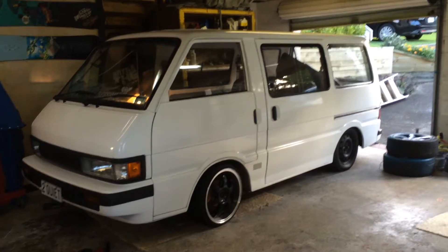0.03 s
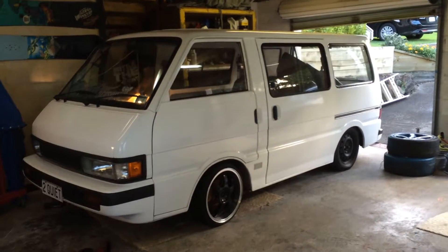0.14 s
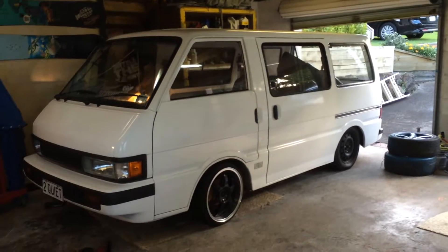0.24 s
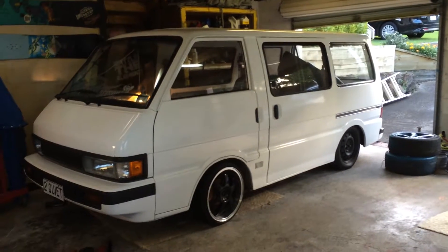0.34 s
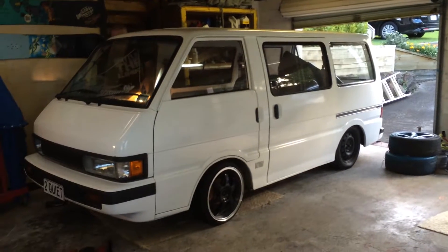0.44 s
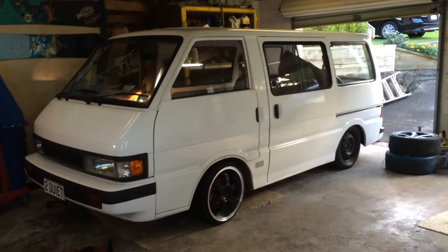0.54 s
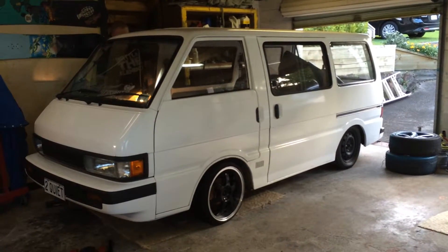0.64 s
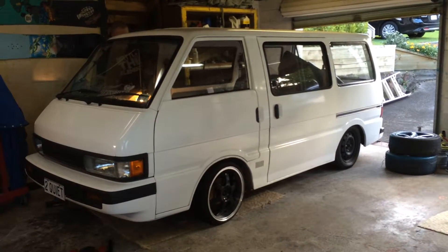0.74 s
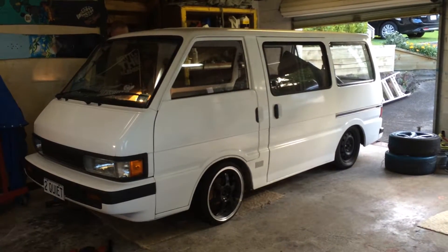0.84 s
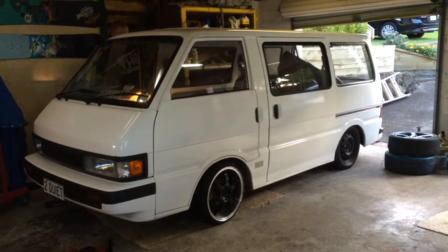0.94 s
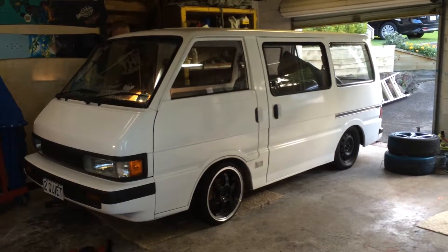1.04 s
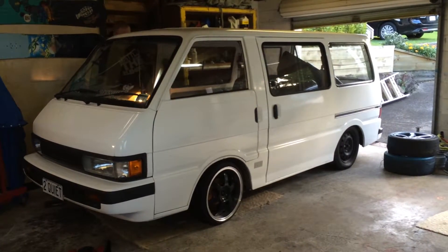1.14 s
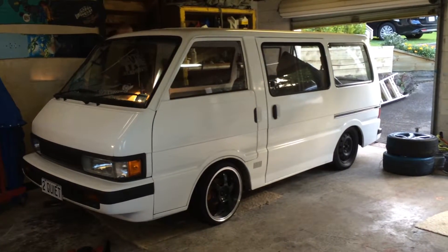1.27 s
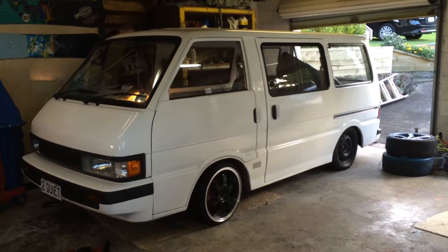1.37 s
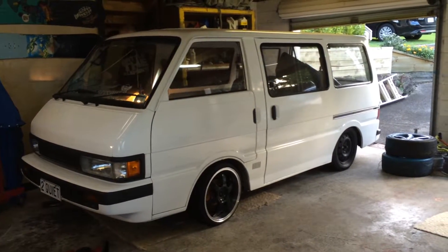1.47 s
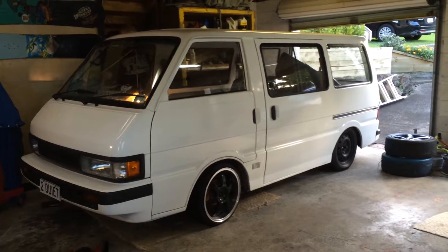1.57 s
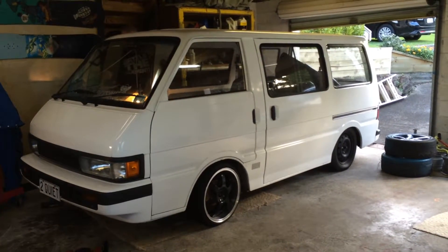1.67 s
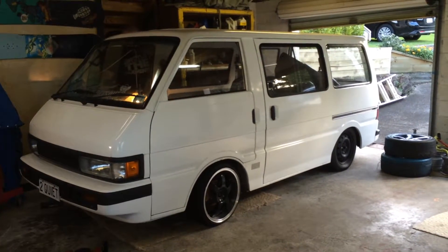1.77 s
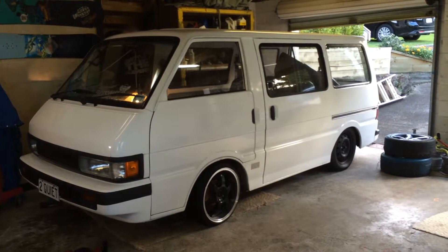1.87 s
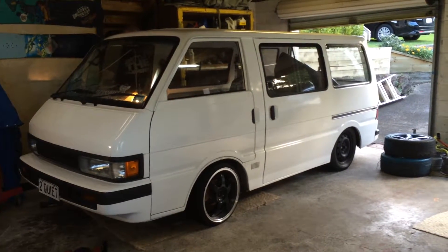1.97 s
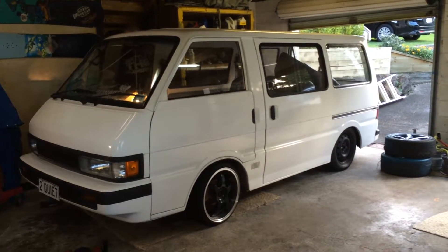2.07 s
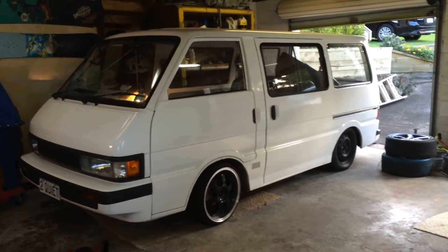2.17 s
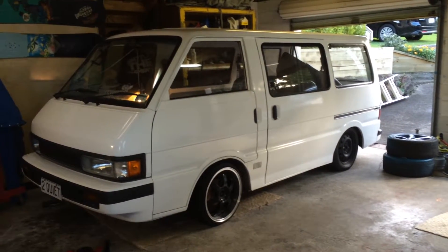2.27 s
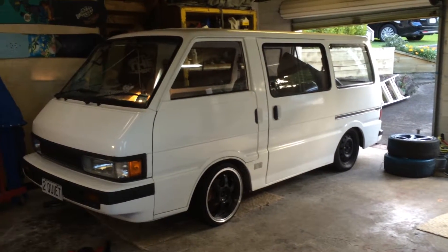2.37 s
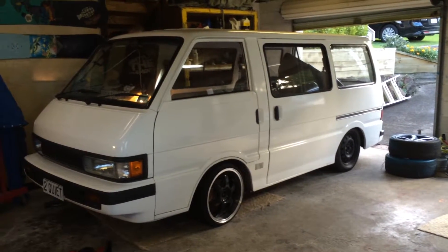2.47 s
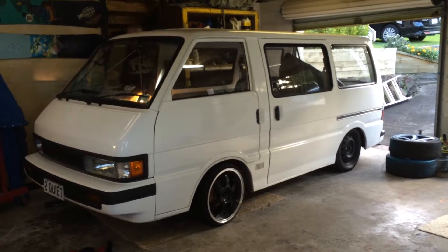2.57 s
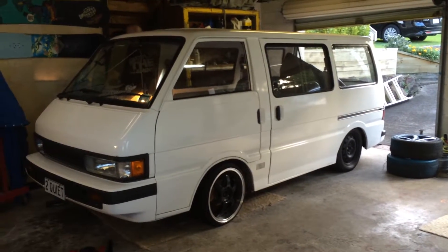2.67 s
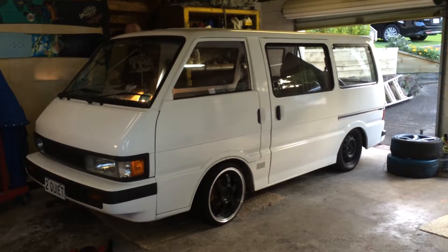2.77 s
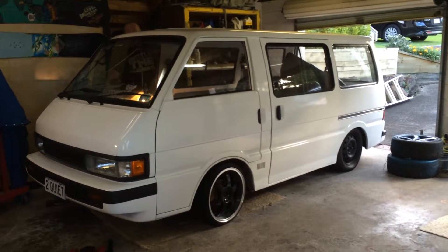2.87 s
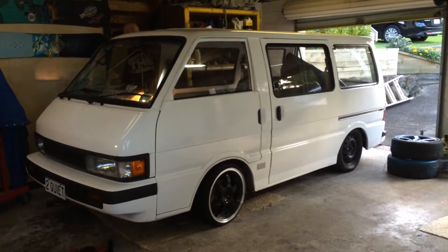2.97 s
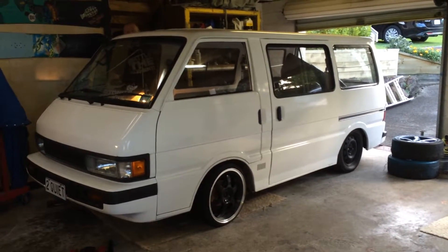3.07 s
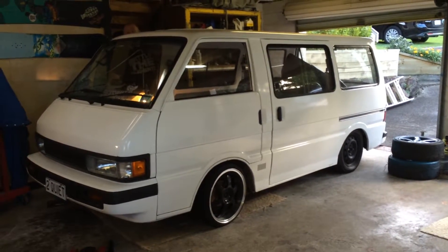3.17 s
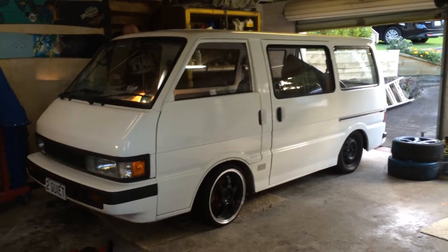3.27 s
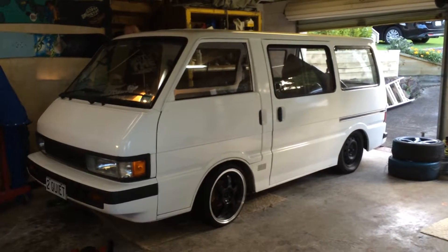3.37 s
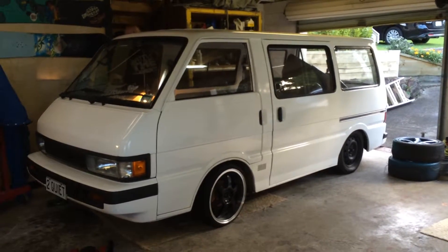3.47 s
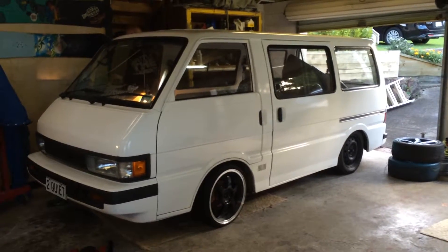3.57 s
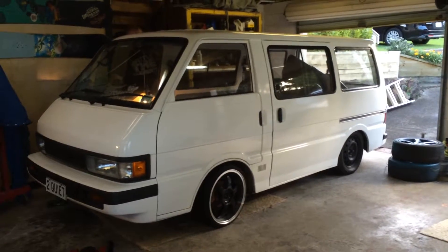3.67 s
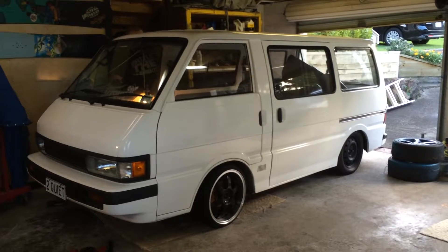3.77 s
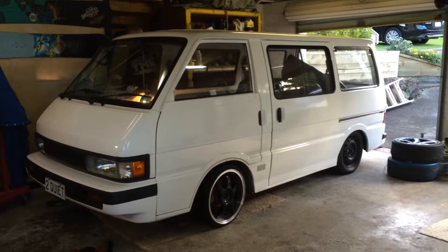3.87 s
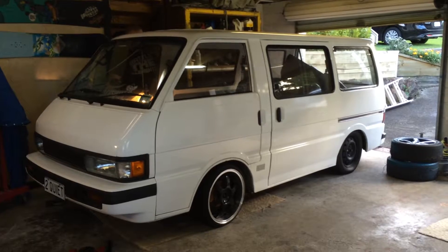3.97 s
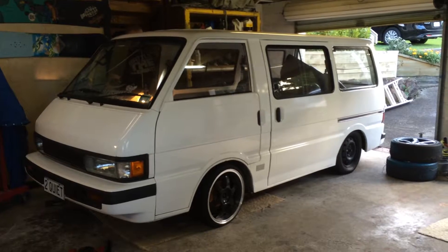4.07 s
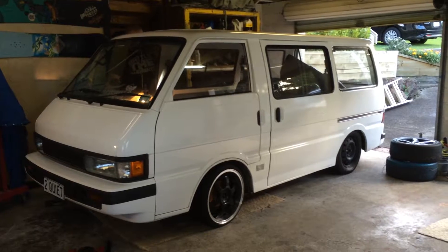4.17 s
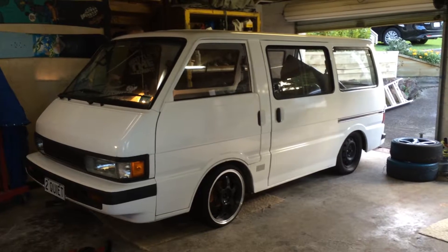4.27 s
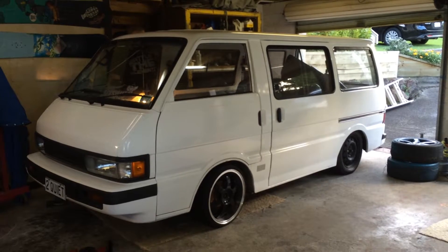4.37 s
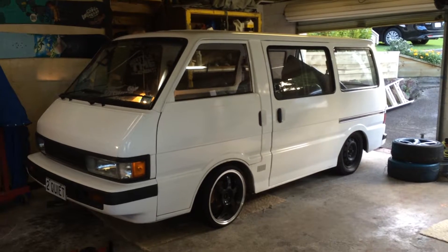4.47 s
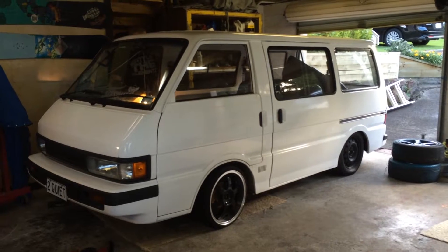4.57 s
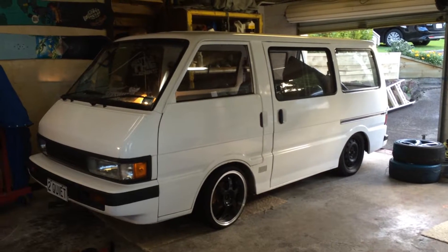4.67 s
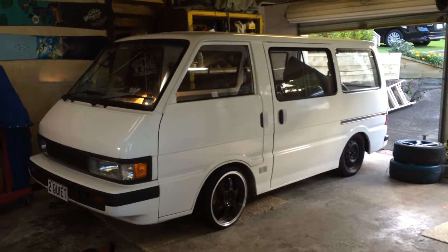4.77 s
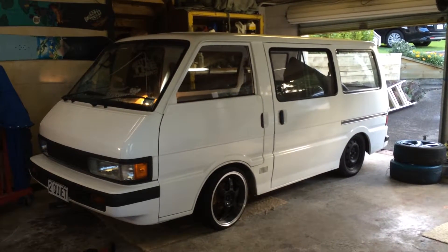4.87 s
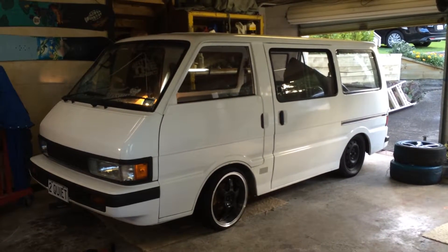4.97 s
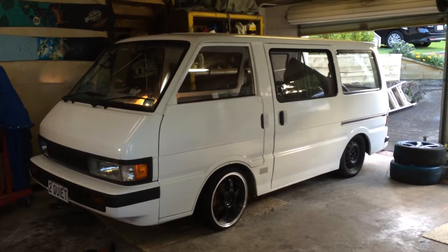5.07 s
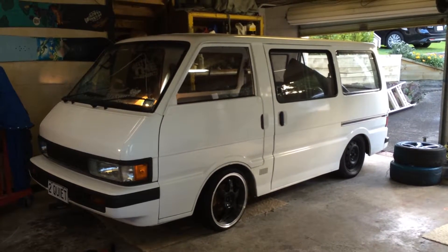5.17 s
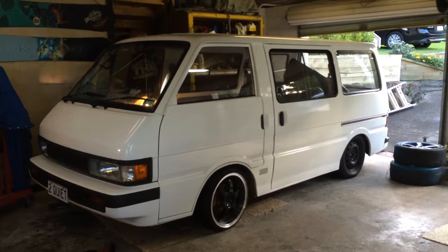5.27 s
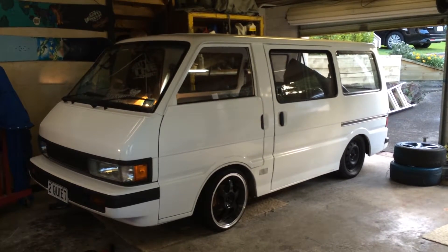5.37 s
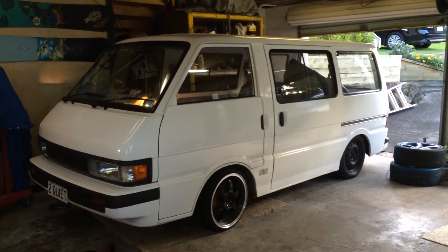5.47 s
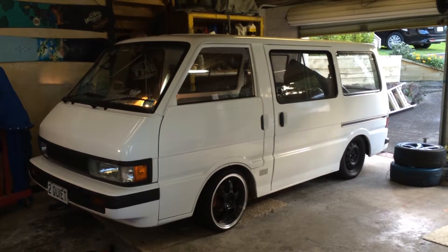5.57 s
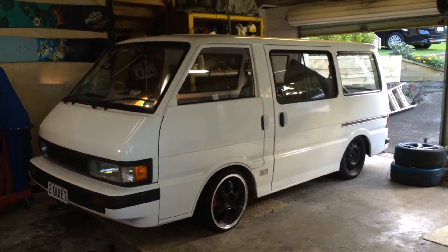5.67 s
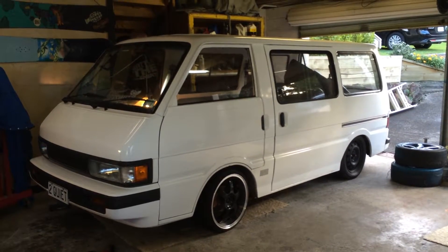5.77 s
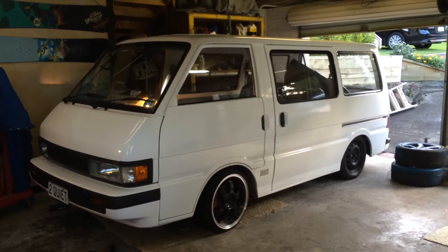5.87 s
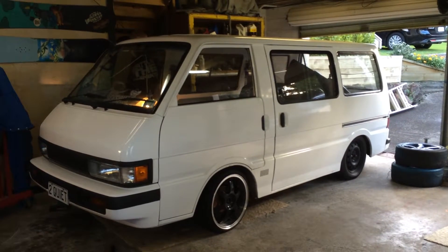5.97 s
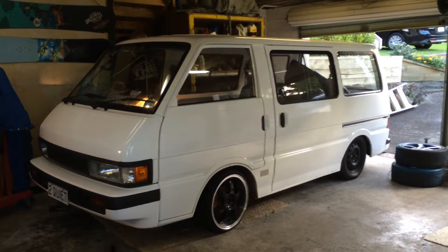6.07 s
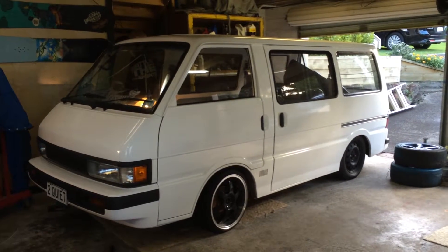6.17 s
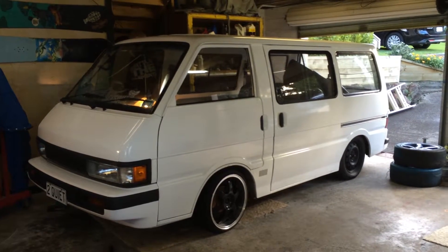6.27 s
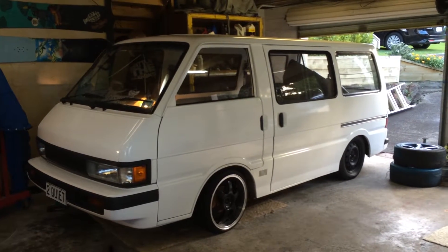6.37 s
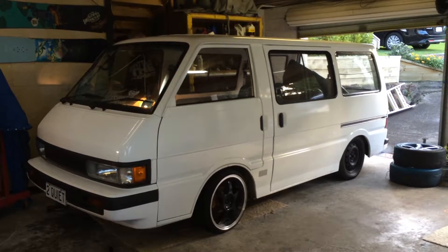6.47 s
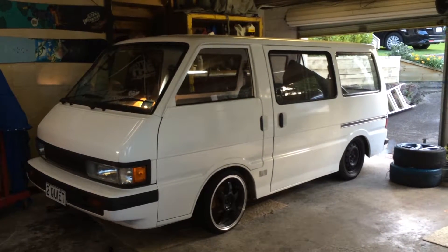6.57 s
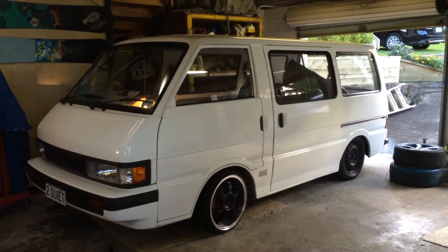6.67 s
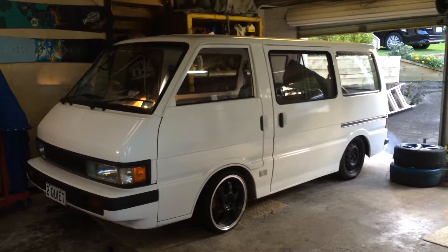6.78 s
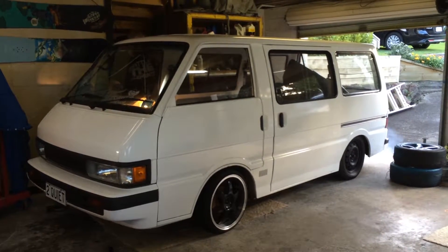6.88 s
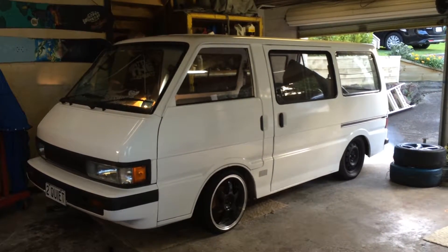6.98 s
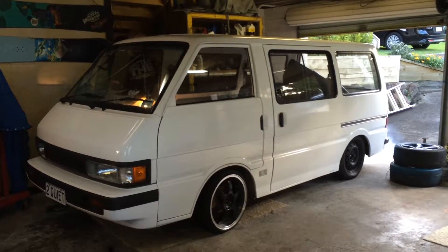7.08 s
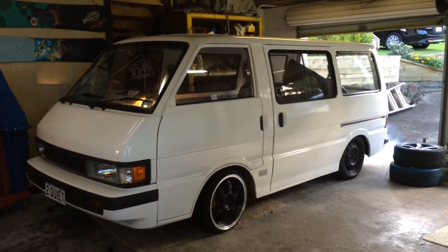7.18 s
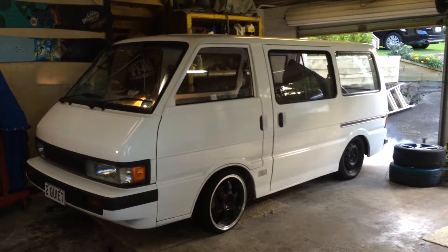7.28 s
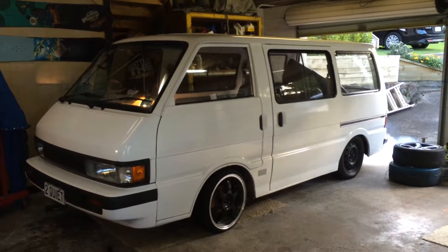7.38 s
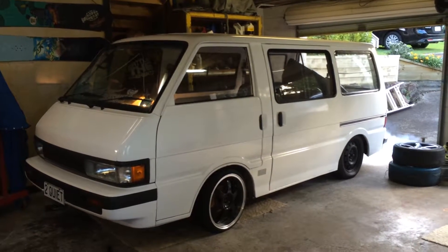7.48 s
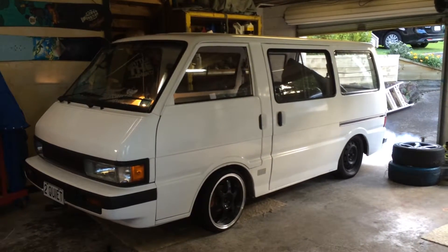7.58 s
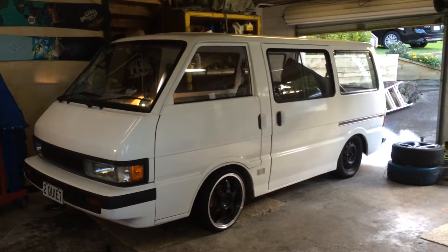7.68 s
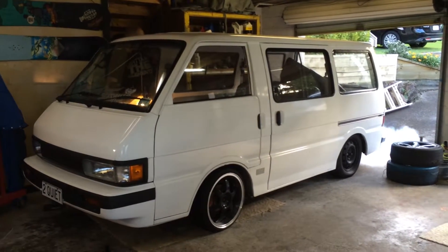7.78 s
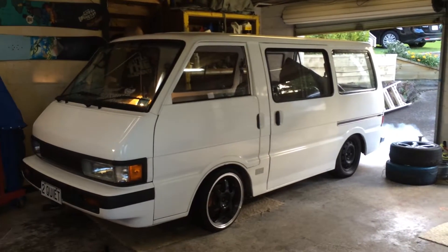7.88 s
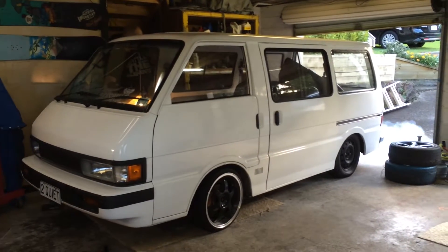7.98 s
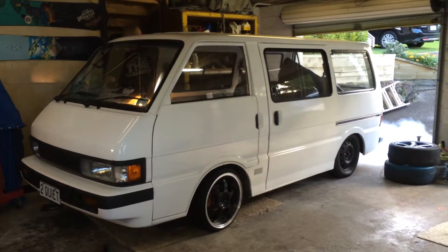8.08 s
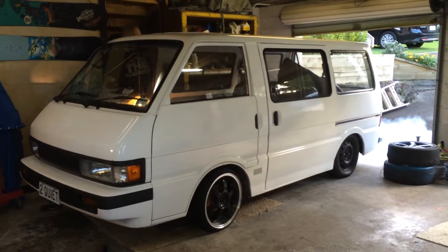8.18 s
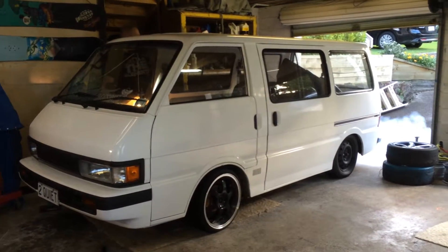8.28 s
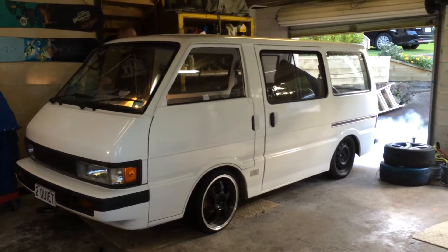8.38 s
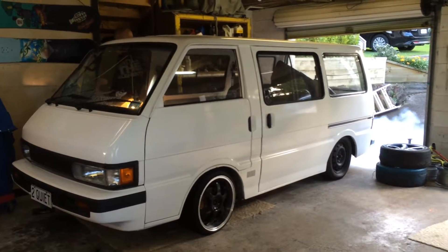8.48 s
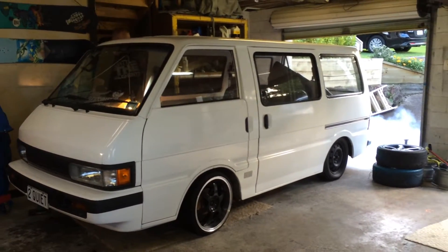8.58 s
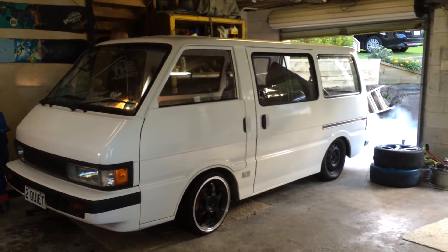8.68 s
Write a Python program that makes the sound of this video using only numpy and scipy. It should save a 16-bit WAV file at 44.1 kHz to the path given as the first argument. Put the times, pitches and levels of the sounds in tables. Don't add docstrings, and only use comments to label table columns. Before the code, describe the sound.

Very quiet opening: garden birds whistling, soft traffic rumble. A small electric pump begins to hum steadily and the birds thin out. Then the starter slams in, rasps for about half a second, and the engine bursts to life with hollow pops. A resonant, nasal exhaust drone takes over, rough and pulsing, with metallic rattle and breathy hiss, slowly dropping in speed. A single fixed microphone near the van in a garage, far louder after the start.

```python
import sys
import numpy as np
from scipy import signal
from scipy.fft import rfft, irfft, next_fast_len
from scipy.io import wavfile
from scipy.ndimage import uniform_filter1d

SR = 44100
rng = np.random.default_rng(int(sys.argv[2]) if len(sys.argv) > 2 else 0)


def boost(x):
    u = np.asarray(x, float) / 20
    return 10 ** u


def dump(signal):
    limited = np.clip(np.atleast_2d(signal).T, -1, 1)
    pcm = np.round(limited * 32767).astype(np.int16)
    wavfile.write(sys.argv[1], SR, pcm)


N = 384552
T = np.arange(N) / SR

# (time [s], peak level [dB])
POP_EVENTS = [(6.194, -15), (6.24, -10.5), (6.284, -11), (6.324, -3.5), (6.345, -10), (6.37, -5.5),
              (6.428, -3), (6.463, -4), (6.509, -6.5), (6.538, -13), (6.599, -4), (8.444, -9), (8.489, -13),
              (8.543, -12), (8.612, -15), (8.664, -14)]
SONG_LULLS = [
    6.61,
    7.37,
]
LULL_S, LULL_DB = 0.1, -6
DRONE_ORDER = 15


def engine():
    # (time [s], speed [turns/s])
    rotor_speed = [(6.6, 12.592), (6.7, 12.498), (6.8, 12.92), (7.1, 12.985), (7.3, 13.261), (7.6, 13.0),
                   (7.9, 12.635), (8.1, 12.226), (8.72, 11.655)]
    # (time [s], level [dB])
    effort = [(6.17, -8), (6.226, -9), (6.24, -2), (6.388, 2.5), (6.52, 4), (6.655, -4), (6.69, -1),
              (7.362, 1), (8.72, -0.2)]
    # (start [s], end [s], first pitch [Hz], last pitch [Hz], level [dB])
    pipe_ringing = [(6.188, 6.24, 157, 121, -20.5), (6.232, 6.285, 200, 180, -18.5),
                    (6.27, 6.35, 124, 94, -20.5), (6.34, 6.43, 208, 208, -15.5),
                    (6.43, 6.57, 220, 213, -16), (6.39, 6.52, 435, 436, -24.5),
                    (6.26, 6.37, 289, 307, -24.5), (6.4, 6.56, 298, 312, -22), (6.585, 6.62, 202, 203, -20),
                    (8.42, 8.49, 315, 325, -23), (8.47, 8.515, 235, 185, -17.5),
                    (8.51, 8.59, 225, 250, -18.5), (8.605, 8.645, 213, 214, -15.5),
                    (8.6, 8.69, 295, 345, -19.5), (8.665, 8.718, 101, 80, -24)]
    speed, effort_db = curve(rotor_speed)[0], curve(effort)[0]
    angle = np.cumsum(speed) / SR
    angle -= angle[round(rotor_speed[0][0] * SR)]

    tuned_db = -10 * np.log10(1 + (2 * (DRONE_ORDER * speed - 185) / 14) ** 2)
    drone_db = -13.1 + 0.17 * effort_db + tuned_db + LULL_DB * bumps(SONG_LULLS, LULL_S)
    firing_db = -21 + 0.7 * effort_db

    running = gate(6.17, 8.95, 0.026)
    exhaust = catching_pops() + ragged_firings(angle, firing_db) * running
    low_cut = signal.butter(2, 62, "high", fs=SR, output="sos")
    exhaust = signal.sosfilt(low_cut, exhaust)
    ringing = streaks(pipe_ringing, 0.095, 0.11, -21)
    note = exhaust_note(angle, drone_db, firing_db)
    return note + exhaust + ringing + clatter_and_hiss(angle, effort_db) * running


def exhaust_note(angle, drone_db, firing_db):
    # (level at high idle [dB], level once it sags [dB])
    order_levels = [(-48, -55), (-46, -44), (-44, -39), (-40, -42), (-42, -46), (-32, -31.5),
                    (-37.5, -29.5), (-39, -41), (-27, -28.5), (-33, -45), (-32, -32.5), (-36, -35),
                    (-33, -39), (-20, -15), (-41, -35), (-42, -34), (-22.5, -32), (-37, -40), (-44, -26.5),
                    (-44, -34), (-36, -41), (-30.5, -33), (-38, -33.5), (-29.5, -34), (-42, -40),
                    (-40, -35), (-34, -44), (-46, -46), (-31, -35), (-45, -40), (-49, -38.5), (-35.5, -38),
                    (-39, -52), (-46, -39.5), (-46, -41), (-49.5, -49), (-42, -40.5), (-47.5, -51),
                    (-40, -42), (-52, -49), (-50, -44.5), (-51, -37.5), (-50, -44.5), (-45.5, -49),
                    (-50.5, -53), (-52, -53), (-47, -46), (-54, -55), (-58, -46.5)]
    on = T > 6.2
    from_blow = angle - 8 / 15
    long_lulls = bumps(SONG_LULLS, 2 * LULL_S)
    sag = np.clip((T[on] - 7.8) / 0.274, 0, 1)
    stumble_db = -3 * np.clip((T[on] - 8.43) / 0.05, 0, 1)
    steady = gate(6.62, 8.95, 0.046)[on]

    throb = 1 + 0.35 * long_lulls * np.cos(2 * np.pi * from_blow)
    song = np.cos(2 * np.pi * (DRONE_ORDER * from_blow + 0.05 * drift(25)))
    note = boost(drone_db + 1.2 * drift(30)) * gate(6.31, 8.45, 0.07) * throb * song

    for order, (high_db, sag_db) in enumerate(order_levels, start=2):
        if order == DRONE_ORDER:
            continue
        level_db = firing_db[on] + 22.2 + high_db + sag * (sag_db - high_db) + 1.6 * drift(14)[on]
        if order > 21:
            level_db += stumble_db
        if order == 18:
            level_db += 0.6 * LULL_DB * long_lulls[on]
        spread = 0.3 * rng.standard_normal() + 0.03 * drift(9)[on]
        note[on] += steady * boost(level_db) * np.cos(2 * np.pi * (order * from_blow[on] + spread))
    return np.sqrt(2) * note


def ragged_firings(angle, firing_db):
    # (frequency [Hz], density [dB per Hz])
    firing_colour = [(15, -52), (25, 3.5), (108, -7.5), (145, -3), (189, -3), (267, -1.5), (308, -12),
                     (354, -15), (401, -37), (474, -23), (600, -15.5), (653, -14), (700, -64), (910, -70),
                     (1540, -120)]
    fired = np.diff(np.floor(5 * angle + 0.25 * drift(60)), prepend=0) > 0
    pulses = fired * rng.standard_normal(N) + 0.019 * rng.standard_normal(N)
    return boost(firing_db - 4) * coloured(echoed(pulses, 0.27, 2.3, 0.0064), firing_colour)


def catching_pops():
    # (frequency [Hz], width [Hz], peak level [dB])
    pipe_modes = [(101, 20, -11), (141, 25, -5), (180, 22, -4.5), (220, 21, -4), (306, 39, -1),
                  (435, 30, -12.5)]
    blows = uniform_filter1d(clicks(POP_EVENTS), size=45)
    return echoed(boost(-6.0) * rung(blows, pipe_modes), 0.22, 0.86, 0.0045)


def clatter_and_hiss(angle, effort_db):
    # (frequency [Hz], density [dB per Hz])
    clatter_colour = [(240, -27), (400, -1), (489, -14), (526, -8.5), (650, -18), (803, -9), (903, -25),
                      (1040, -15.5), (1360, -10.5), (2120, -16), (2710, -29), (3210, -14.5), (5000, -21),
                      (6500, -51), (11000, -120)]
    # (frequency [Hz], width [Hz], level [dB])
    panel_modes = [(435, 21, -2), (465, 12, -1), (531, 19, -1.5), (610, 28, -9), (798, 13, -2.5),
                   (1034, 23, 7), (1140, 32, 6.5), (1246, 34, 5.5), (1370, 27, 6), (1543, 60, -1),
                   (1755, 280, 16.5), (2658, 44, 8), (2850, 160, 13.5)]
    # (frequency [Hz], density [dB per Hz])
    hiss_colour = [(1760, -8.5), (3000, 0.5), (3210, -9), (4070, -5), (5190, -4), (6580, -1.5),
                   (8170, -2.5), (13400, -5), (15100, -9)]
    # (time [s], peak level [dB])
    blowdowns = [(6.6712, -25), (6.7174, -15), (6.7994, -12.5), (6.8744, -21), (6.9514, -14),
                 (7.0274, -13.5), (7.1044, -17), (7.1794, -15.5), (7.2594, -16.5), (7.3344, -15),
                 (7.4084, -13), (7.4844, -15), (7.5624, -18), (7.6394, -21.5), (7.7144, -14.5),
                 (7.7894, -15.5), (7.873, -15), (7.9534, -13.5), (8.0324, -19), (8.1174, -15.5),
                 (8.1973, -15), (8.2794, -14.5), (8.3674, -14), (8.45, -14), (8.5345, -16), (8.6214, -14),
                 (8.7014, -16)]
    misses = [
        7.69,
        8.015,
        8.34,
        8.683,
    ]
    sparks = np.minimum(rng.exponential(1, N), 4)
    struck = rng.random(N) < 1200 / SR
    grit = rng.standard_normal(N) * (1 + 0.5 * boost(3.1 * sparks) * struck)

    hard = signal.lfilter([1], [1, -np.exp(-1 / (0.015 * SR))], (boost(14.5) * clicks(blowdowns)) ** 2)
    miss_db = -3.5 * bumps(misses, 0.015)

    clatter = coloured(grit, clatter_colour) + 0.62 * evened(rung(grit, panel_modes))
    clatter *= boost(-28.5 + 0.99 * effort_db + 0.57 * miss_db)
    clatter *= puffing(angle, column=2, decay=0.051, floor=0.47, hard=0.26 * hard)

    hiss = boost(-28.5 + 1.35 * effort_db + miss_db) * coloured(grit[::-1], hiss_colour)
    hiss *= puffing(angle + 0.015, column=1, decay=0.25, floor=0.27, hard=hard)
    return clatter + hiss


def puffing(angle, column, decay, floor, hard):
    # (angle [turns], hiss level [dB], clatter level [dB])
    puffs = [
        (.5, -12, -3),
        (.59, -2, -1),
        (.87, -6, -2),
        (.03, -9, -3),
        (.3, -7, 0),
    ]
    power = floor + hard
    for row in puffs:
        turns = angle - row[0]
        luck_db = 2.1 * rng.standard_normal(200)[np.floor(turns).astype(int) % 200]
        power = power + boost(2 * (row[column] + luck_db)) * np.exp(-(turns % 1) / decay)
    pop_power = signal.lfilter([1], [1, -np.exp(-1 / (0.035 * SR))], clicks(POP_EVENTS))
    power = uniform_filter1d(np.where(T < 6.66, floor * 0.43 + pop_power, power), 90)
    return np.sqrt(power / uniform_filter1d(power, 12000))


def starter():
    # (time [s], level [dB])
    slams = [
        (5.713, -42),
        (5.73, -17),
        (5.746, -14),
        (5.76, -16),
        (5.786, -17),
    ]
    # (frequency [Hz], width [Hz], level [dB])
    bell_modes = [(213.4, 5.5, -6), (297, 32, -0.5), (627, 34, -2), (810, 26, -9), (1430, 90, -20),
                  (2340, 69, -4)]
    # (time [s], level [dB])
    grind_level = [(5.697, -37), (5.711, -23.5), (5.74, -20.5), (5.81, -27.5), (6.17, -29), (6.3, -27.5)]
    # (frequency [Hz], density [dB per Hz])
    grind_colour = [(240, -36), (400, -11.5), (568, -8.5), (772, -4), (1360, -0.5), (2370, -8.5),
                    (2780, -7), (4130, -14), (6000, -17), (7800, -23), (13200, -120)]
    # (frequency [Hz], density [dB per Hz])
    thump_colour = [(18, -33), (30, -2), (53, 5), (107, -7), (167, -2), (253, -12.5), (390, -5.5),
                    (500, -17), (650, -44), (1100, -120)]
    compressions = [
        5.875,
        6.06,
        6.22,
    ]
    vents = [
        5.93,
        6.055,
        6.155,
        6.29,
    ]
    engaged_s = slams[0][0]
    squeeze = bumps(compressions, 0.047)
    turning = np.clip((T - engaged_s) / 0.5, 0, 1)
    grind_db = curve(grind_level)[0] - 2.5 * squeeze
    thump_db = -49 + 14.5 * np.sqrt(turning) + 6 * squeeze
    venting = sum(bumps([s], 0.053) * (1 + 0.25 * k) for k, s in enumerate(vents))
    top_db = -19.4 + 8.5 * venting + 8 * bumps([engaged_s], 0.089)

    bites = np.minimum(rng.exponential(1, N), 3)
    meshed = rng.random(N) < 1500 / SR
    teeth = rng.standard_normal(N) * (1 + boost(2.0 * bites) * meshed)
    top = coloured(teeth, [(3000, -6), (5000, -9.0), (8500, -4.0), (10000, -7.0), (15500, -8.5)])
    thump = boost(thump_db + 1.8 * drift(30)) * coloured(teeth, thump_colour)
    grind = boost(grind_db) * (boost(-3) * coloured(teeth, grind_colour) + boost(top_db) * top)
    slam = boost(-6.5) * rung(clicks(slams), bell_modes)
    return (grind + thump) * gate(5.695, 6.3, 0.005) + gear_whine() + slam


def gear_whine():
    # (start [s], end [s], first pitch [Hz], last pitch [Hz], level [dB])
    mesh_lines = [(5.72, 5.81, 1432, 1328, -30.5), (5.8, 5.91, 1380, 1440, -35),
                  (5.81, 5.89, 1033, 1065, -37.5), (5.82, 5.88, 1680, 1850, -36.5),
                  (5.895, 5.955, 960, 985, -37), (5.94, 6, 1400, 1380, -33), (5.99, 6.045, 1480, 1560, -34),
                  (5.96, 6.03, 803, 805, -36), (5.97, 6.03, 1115, 1220, -38), (5.94, 5.98, 2770, 2690, -38),
                  (6.07, 6.17, 1220, 1150, -35), (6.08, 6.12, 1686, 1650, -33.5),
                  (6.08, 6.14, 2800, 2780, -38.5), (5.72, 5.8, 640, 605, -31.5),
                  (5.78, 5.86, 344, 363, -33.5), (5.99, 6.04, 394, 384, -38), (5.715, 5.75, 1054, 950, -30),
                  (5.7, 5.76, 1900, 1870, -35), (5.705, 5.74, 2310, 2280, -33),
                  (5.71, 5.77, 2800, 2780, -37), (5.725, 5.76, 3480, 3450, -35),
                  (6.12, 6.16, 2460, 2430, -43), (6.22, 6.26, 1250, 1230, -34)]
    case_rings = [
        (5.72, 6.22, 1380, 1430, -37),
        (5.74, 6.2, 995, 1180, -40),
    ]
    release = [
        (6.225, 6.28, 2980, 2650, -28),
    ]
    mesh = streaks(mesh_lines, 0.016, 0.12, -11)
    case = streaks(case_rings, 0.063, 0.11, -23)
    return mesh + case + streaks(release, 0.34, 0.1, -19)


def fuel_pump():
    # (time [s], pitch of its fourth order [Hz], level [dB])
    spin = [(3.46, 211.5, -51), (3.55, 211.1, -49), (3.59, 222.3, -42), (3.72, 222.5, -39.5),
            (3.84, 222.4, -42.5), (3.92, 219.1, -46), (5.68, 219.2, -45)]
    # (order [per turn], level [dB])
    shaft_orders = [(5, -62), (6, -58), (7, -72.5), (8, -62), (9, -74), (11, -68), (15, -80), (16, -79),
                    (18, -80), (28, -78)]
    # (frequency [Hz], density [dB per Hz])
    brush_colour = [(2000, 1), (4000, -3), (6500, -5.5), (9000, -2), (15000, -1)]
    hz, db = curve(spin)
    shaft = np.cumsum(hz) / SR / 4
    settled = np.clip((T - 3.5) / 0.42, 0, 1)
    tone = boost(db) * np.sin(2 * np.pi * 4 * shaft)
    for order, order_db in shaft_orders:
        level_db = order_db + 0.5 * drift(7.3)
        if order == 8:
            level_db = level_db - 13 * np.clip((T - 3.9) / 0.69, 0, 1)
        tone += settled * boost(level_db) * np.sin(2 * np.pi * (order * shaft + rng.random()))
    hiss = boost(-64 + 1.0 * drift(14)) * coloured(rng.standard_normal(N), [(500, -38)] + brush_colour)
    return np.sqrt(2) * tone * gate(3.455, 6.2, 0.018) + hiss * gate(3.485, 6.2, 0.0077)


def birds():
    # (start [s], end [s], first pitch [Hz], last pitch [Hz], level [dB])
    buzzes = [(.5, .63, 5500, 5400, -64), (.56, .68, 5000, 5000, -61), (1.78, 1.96, 3800, 3700, -66),
              (1.36, 1.61, 3300, 3100, -67), (0.72, .94, 3300, 3600, -65), (3.4, 3.78, 4500, 4300, -72),
              (1.64, 1.76, 4900, 4100, -63.5), (1.51, 1.707, 5450, 5350, -57), (1.8, 1.95, 6900, 6600, -75),
              (2.55, 2.74, 4400, 4600, -71.5), (2.66, 2.8, 4600, 5600, -68), (2.75, 3.1, 6800, 6500, -76),
              (2.5, 3.12, 6000, 5840, -75), (3.39, 3.49, 4580, 4570, -74), (3.59, 3.5, 4600, 4200, -72),
              (4.44, 4.499, 5400, 5300, -67), (5.17, 5.42, 6200, 6600, -64), (5.17, 5.35, 5200, 5800, -67),
              (5.48, 5.62, 6900, 6800, -73), (5.38, 5.58, 8300, 6700, -68), (5.58, 5.72, 7900, 7600, -67)]
    # (start [s], end [s], first pitch [Hz], last pitch [Hz], level [dB])
    far_calls = [(.26, .32, 4650, 4500, -67), (.5, .7, 5620, 5500, -63.5), (.555, .61, 5200, 5250, -56),
                 (.62, .73, 5150, 5250, -62), (1.29, 1.4, 3430, 3550, -69), (1.39, 1.47, 3580, 3750, -67),
                 (2.43, 2.53, 2900, 3150, -72), (2.48, 2.7, 2305, 2380, -72), (2.68, 2.82, 2400, 2970, -74),
                 (2.86, 3.11, 6700, 7300, -77), (3.57, 3.6, 5330, 5420, -65), (1.64, 1.8, 5540, 5400, -72),
                 (1.12, 1.17, 3950, 3950, -66), (1.2, 1.27, 3980, 4050, -69),
                 (1.715, 1.745, 14300, 14300, -78), (1.53, 1.65, 11000, 11000, -80),
                 (3.59, 3.66, 4620, 4520, -70)]
    # (start [s], length [s], first pitch [Hz], last pitch [Hz], level [dB])
    strokes = [(.257, 0.017, 2700, 4150, -71), (.272, 0.028, 4180, 3670, -59), (.3, 0.011, 3700, 4040, -59),
               (.305, .017, 3620, 2900, -67), (.32, 0.025, 2980, 3800, -51), (.337, 0.017, 3770, 2850, -52),
               (.355, 0.014, 2850, 3300, -53), (.716, .024, 3880, 5500, -60), (.74, 0.041, 5550, 3710, -65),
               (.72, 0.055, 3200, 2700, -66), (.78, 0.033, 2600, 3500, -62), (.812, .04, 3530, 4130, -65),
               (.85, .036, 4100, 2900, -62), (1.075, .027, 3000, 4800, -65), (1.1, .014, 4990, 5600, -68),
               (.735, .014, 6000, 6300, -71), (1.114, 0.035, 4500, 3000, -62),
               (1.164, 0.016, 2880, 3780, -61), (1.172, 0.026, 3600, 4330, -57),
               (1.2, .018, 4100, 3000, -64), (1.495, 0.026, 2790, 2300, -64), (3.195, .03, 3200, 3400, -73),
               (1.27, 0.033, 3700, 2800, -71), (1.35, 0.044, 2600, 3500, -67),
               (1.74, 0.04, 2600, 3780, -69), (1.8, 0.039, 2500, 3400, -68), (3.225, .025, 3450, 4600, -71),
               (3.24, 0.018, 5200, 5400, -65), (3.258, .012, 6200, 5000, -61),
               (3.265, .027, 4300, 3500, -62), (3.308, 0.035, 3470, 4600, -63),
               (3.558, .024, 3600, 5600, -67), (3.59, .026, 4650, 3600, -59),
               (3.623, .014, 3700, 4000, -62), (3.638, 0.035, 3500, 5200, -61),
               (3.67, 0.017, 5230, 3500, -67), (3.928, .013, 4500, 3600, -64),
               (3.95, 0.017, 3100, 3500, -61)]
    # (start [s], length [s], first pitch [Hz], last pitch [Hz], level [dB])
    slides = [(0.43, 0.076, 3400, 2260, -58), (1.454, 0.041, 3400, 2700, -60), (1.65, .04, 2550, 2500, -64),
              (3.55, .06, 3050, 3050, -71), (3.605, 0.15, 3050, 2950, -62), (1.905, .03, 3200, 3500, -64),
              (.8, .03, 3900, 4300, -60), (1.49, .04, 2400, 2400, -70), (3.89, 0.058, 4550, 4500, -64),
              (4.279, 0.22, 4670, 4580, -64), (4.393, 0.12, 3150, 3110, -59),
              (3.895, 0.042, 4100, 3550, -59), (3.962, 0.037, 3450, 2700, -56.5),
              (4.54, 0.046, 4800, 4730, -68), (4.872, .022, 3680, 3600, -57)]
    out = streaks(buzzes, 0.09, 0.6, -22) + streaks(far_calls, 0.037, 0.4, -30)
    for rows, haste, fade_db in [(strokes, 1, 0), (slides, 0.65, -6.5)]:
        for start, length, first, last, db in rows:
            u = np.arange(0, 1, 1 / (length * SR))
            path_hz = first + (last - first) * u ** haste
            out[round(start * SR):][:len(u)] += whistle(path_hz, db + fade_db * u)
    return echoed(out, 0.36, -3.5, 0.012)


def whistle(path_hz, db):
    noises = rng.standard_normal((2, 14000))
    waver, flutter = (evened(uniform_filter1d(w, size=110))[:len(db)] for w in noises)
    phase = 2 * np.pi * np.cumsum(path_hz * (1 + 0.022 * waver)) / SR
    tone = np.sqrt(2) * np.sin(phase) * boost(db)
    return tone * (1 + 0.4 * flutter) * signal.windows.tukey(len(db), 0.3)


def air():
    # (frequency [Hz], density [dB per Hz])
    air_colour = [(15, -43), (25, -8.5), (135, -2), (163, -9), (197, -5), (355, -14), (440, -18),
                  (1250, -17.5), (1920, -21), (2380, -25.5), (3750, -30), (6950, -41), (15100, -51)]
    # (time [s], level [dB])
    air_level = [(0, -66.5), (1.2, -65), (1.7, -63), (2.4, -65.5), (3.9, -65), (5.7, -61)]
    # (start [s], end [s], frequency [Hz], level [dB])
    hums = [
        (0, 2.3, 130.7, -59.5),
        (2.95, 4.1, 135, -55.5),
        (3.05, 5.75, 69.4, -56),
        (3.5, 3.9, 168, -56),
    ]
    # (start [s], end [s], frequency [Hz], level [dB])
    rumbles = [(0, .25, 55.6, -53), (.4, 1.1, 65, -66), (3.5, 3.9, 167, -51), (3.72, 3.88, 332, -57.5),
               (3.9, 5.7, 145, -59.5), (0, 3.4, 870, -66)]
    z = signal.stft(coloured(rng.standard_normal(N), air_colour), SR, nperseg=1024)[2]
    patches = uniform_filter1d(rng.standard_normal(z.shape), 14, 0)
    patches = evened(uniform_filter1d(patches, 10, 1))
    wash = signal.istft(z * boost(1.3 * patches), SR, nperseg=1024)[1][:N]
    out = boost(curve(air_level)[0] + 10.5) * wash

    bands = [(*row, 2.6) for row in hums]
    bands += [(*row, 0.26 * row[2]) for row in rumbles]
    for start, end, hz, db, width in bands:
        on = (T > start - 0.1) & (T < end)
        fuzz = evened(resonate(rng.standard_normal(N)[on], hz, width))
        core = 8 / width * np.sin(2 * np.pi * hz * T[on])
        out[on] += boost(db) * gate(start - 0.05, end, 0.072)[on] * evened(core + fuzz)
    return out


def streaks(rows, share, throb, overtone_db):
    out = np.zeros(N)
    for start, end, first, last, db in rows:
        t = np.arange(start, end, 1 / SR)
        hz, width = np.linspace(first, last, len(t)), share * first
        rasp = rng.standard_normal(SR)[:len(t)] * (1 + throb * np.sin(2 * np.pi * 130 * t))
        buzz = evened(resonate(resonate(rasp, hz, width), hz, width))
        buzz += boost(overtone_db) * (buzz ** 2 - 1)
        out[round(start * SR):][:len(t)] += boost(db) * buzz * signal.windows.tukey(len(t), 0.6)
    return out


def resonate(x, hz, width):
    turn = np.exp(2j * np.pi * np.cumsum(hz * np.ones(len(x))) / SR)
    r = np.exp(-np.pi * width / SR)
    return 2 * (turn * signal.lfilter([1 - r], [1, -r], x / turn)).real


def rung(x, modes):
    t = T[:6000]
    ring = np.zeros(len(t))
    for hz, width, db in modes:
        ring += boost(db) * np.exp(-np.pi * width * t) * np.sin(2 * np.pi * hz * t)
    return signal.oaconvolve(x, ring)[:N]


def echoed(x, t60, wet_db, gap):
    t = T[:SR // 2]
    taps = rng.choice([-1., 1.], len(t)) * (rng.random(len(t)) < 0.05)
    taps = taps * boost(-60 * t / t60) * (t > gap)
    return x + boost(wet_db) * signal.oaconvolve(x, taps / np.linalg.norm(taps))[:N]


def coloured(x, points):
    f, db = np.transpose(points)
    n = next_fast_len(len(x))
    hz = np.fft.rfftfreq(n, 1 / SR)
    gain = boost(np.interp(np.log(hz + 1), np.log(f), db))
    return evened(irfft(rfft(x, n) * gain, n)[:len(x)])


def drift(hz):
    slow = T[::128]
    waves = sum(np.sin(2 * np.pi * (f * slow + rng.random())) for f in hz * np.geomspace(0.1, 1, num=12))
    return evened(waves).repeat(128)[:N]


def clicks(rows):
    x = np.zeros(N)
    for s, db in rows:
        x[round(s * SR)] = boost(db)
    return x


def bumps(times, width):
    return sum(np.exp(-((T - s) / width) ** 2) for s in times)


def gate(start, end, fade):
    return np.clip((T - start) / fade, 0, 1) * np.clip((end - T) / fade, 0, 1)


def curve(rows):
    s, *columns = np.transpose(rows)
    return [np.interp(T, s, c) for c in columns]


def evened(x):
    return x / np.sqrt(np.mean(x ** 2) + 1e-20)


def scene():
    return (engine() + starter() + fuel_pump() + birds() + air())[None]


def top_cut(x):
    return signal.sosfilt(signal.butter(12, 15280, fs=SR, output="sos"), x)


def record(dry):
    cut = signal.sosfilt(signal.butter(2, 30, "high", fs=SR, output="sos"), dry)
    over = np.maximum(abs(cut) - 0.45, 0)
    held = cut - np.sign(cut) * (over - 0.27 * np.tanh(over / 0.27))
    edge = signal.firwin(511, 15400, window=("kaiser", 9), fs=SR)
    mix = signal.oaconvolve(held, edge[None], "same")
    return top_cut(mix)


dry = scene()
out = record(dry)
dump(out)
```